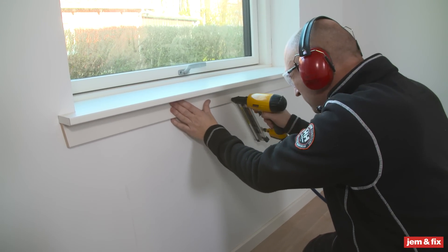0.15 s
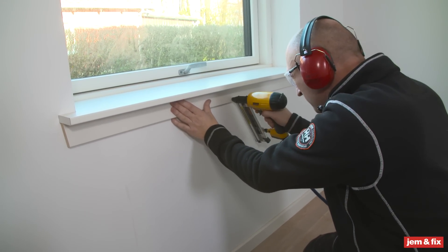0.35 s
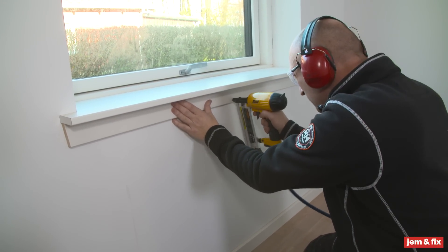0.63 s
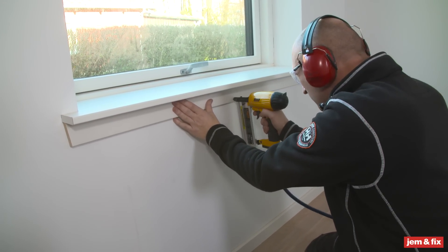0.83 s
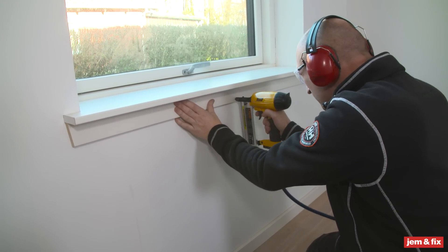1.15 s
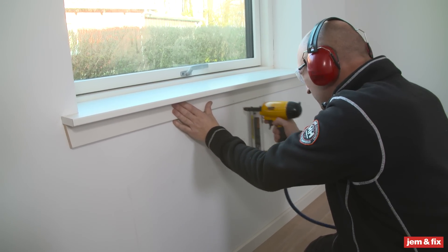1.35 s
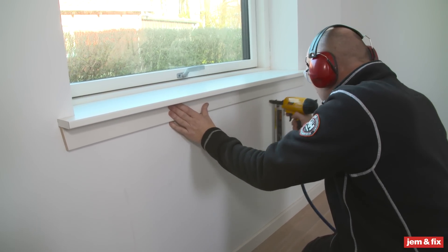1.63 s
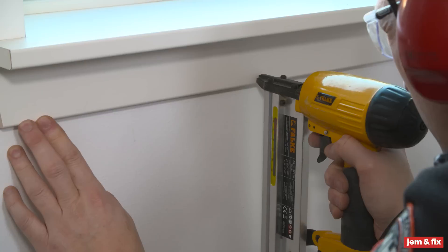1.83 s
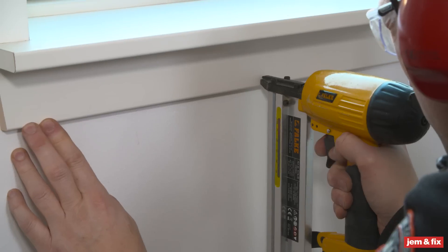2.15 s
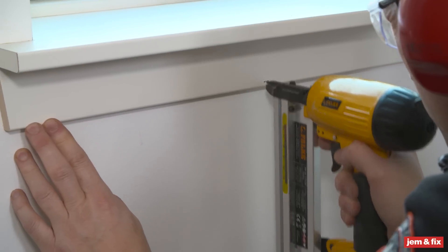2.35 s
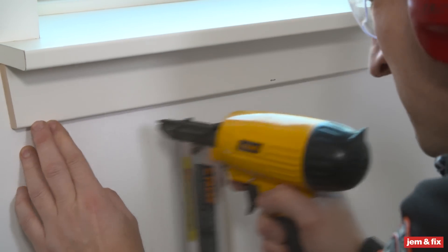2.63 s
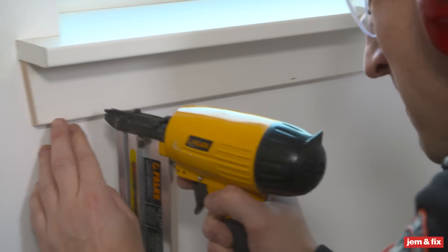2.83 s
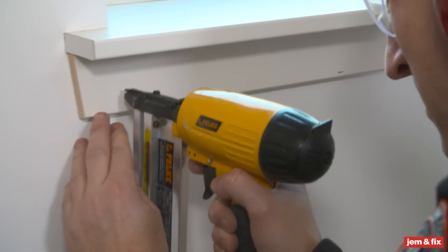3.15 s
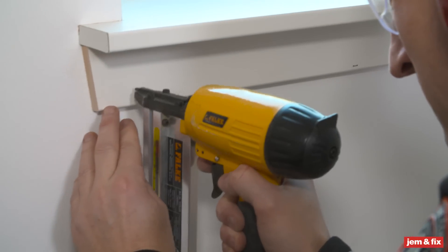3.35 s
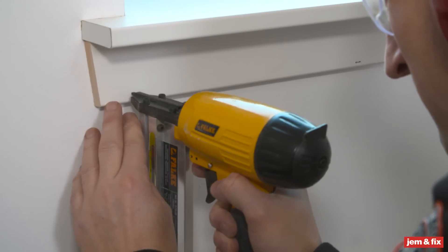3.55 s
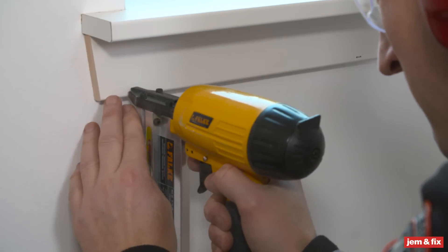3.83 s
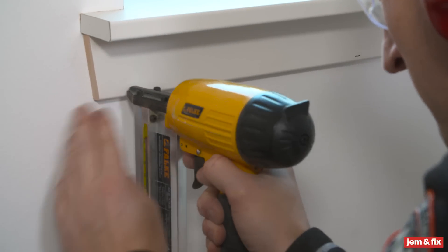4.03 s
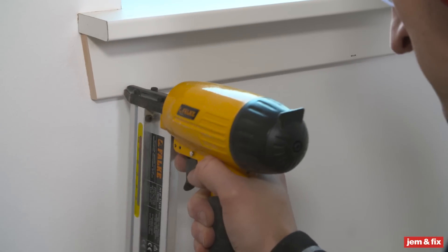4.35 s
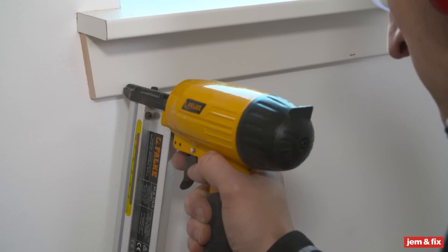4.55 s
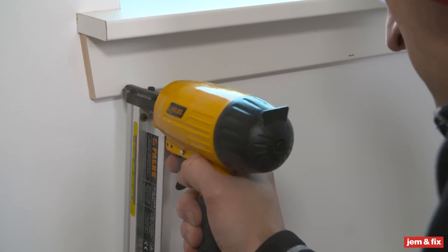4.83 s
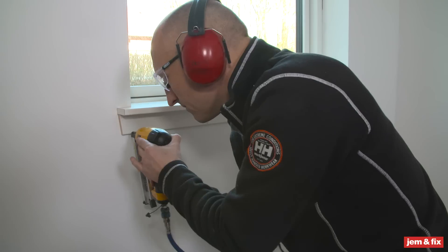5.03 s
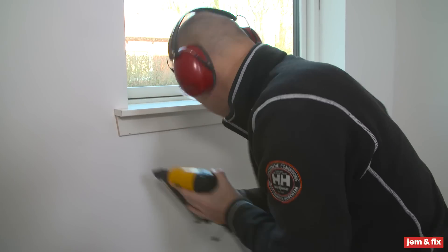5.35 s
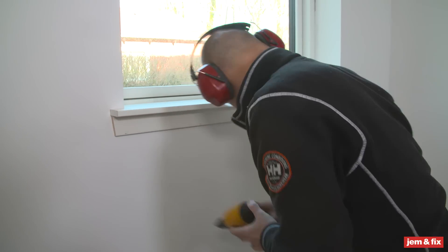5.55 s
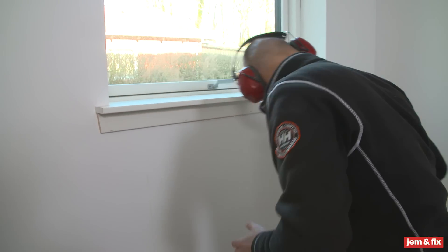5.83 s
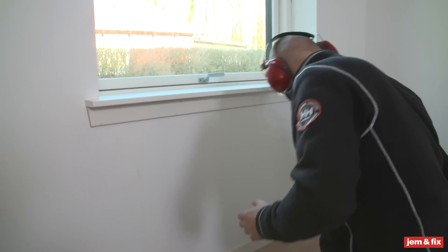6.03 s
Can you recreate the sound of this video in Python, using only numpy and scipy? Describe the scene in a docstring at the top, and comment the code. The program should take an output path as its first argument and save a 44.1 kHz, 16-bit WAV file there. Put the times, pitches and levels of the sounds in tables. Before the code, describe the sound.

A quiet, bare plaster room with faint low air noise, heard through one microphone. From 0 to 0.7 seconds a hand slides softly on wall and board; tiny low judders and clicks follow to 1.07. At 1.08 the air nailer spits, bangs into wood at 1.12, then blasts exhaust with a deep puff and piston knock around 1.25, hiss and hard room echo fading for about half a second. At 1.7 steel scrapes briefly on wood. The second shot comes at 2.18 to 2.4. From 2.7 sleeves and hands rub lightly; at 3.0 a small click, at 3.54 to 3.82 firmer wooden knocks and metallic ticks, then near quiet. A click at 4.98 leads straight into the third shot, banging at 5.02, exhausting near 5.17. At 5.58 a shoe lands and slides, a jacket swishes strongly around 5.8, and bright metal clicks sound at 6.03 and 6.11. Limiting flattens the shots and lifts their tails.

```python
"""A bare, echoing room: under a window sill a pneumatic nailer fixes a trim board with three shots.
Each is a spit of air at the valve, the driver's bang, the exhaust blast and the knock of the returning piston.
Coloured noise makes air and friction, dying noise bursts make blows, decaying sines make the ringing.
Between shots the gun touches the board, hands and sleeves rub; at the end the worker steps away.
One microphone hears it all over faint room air, and the recorder's limiter squashes the shots."""
import sys
import numpy as np
from scipy import signal
from scipy.fft import rfft, irfft
from scipy.io import wavfile
from scipy.ndimage import uniform_filter1d

SR = 44100
rng = np.random.default_rng(int(sys.argv[2]) if len(sys.argv) > 2 else 0)


def generate_wav(sig):
    """Save sig (samples, or channels by samples) to the path in sys.argv[1] as 16-bit PCM at SR."""
    pcm = np.round(np.clip(np.atleast_2d(sig).T, -1, 1) * 32767).astype(np.int16)
    wavfile.write(sys.argv[1], SR, pcm)


N = 273420
T = np.arange(N) / SR
AGE = T[:int(1.3 * SR)]   # time axis of one short sound


def from_db(db):
    """Amplitude ratio of a level in dB."""
    return 10 ** (np.asarray(db) / 20)


def rms_one(x):
    """Scales a signal to an RMS of 1."""
    return x / np.sqrt(np.mean(x ** 2) + 1e-20)


def at_hz(points, hz):
    """Reads a table on a log-frequency axis."""
    at, values = np.transpose(points)
    return np.interp(np.log(np.maximum(hz, 1)), np.log(at), values)


def through(x, response):
    """Convolves a sound with an impulse response, keeping its length."""
    return signal.oaconvolve(x, response)[:len(x)]


def place(sound, start):
    """Puts a short sound on the scene's time line."""
    return np.r_[np.zeros(int(start * SR)), sound, np.zeros(N)][:N]


def colour(x, spectrum, size=4096):
    """Causal (minimum-phase) filter that keeps the power of white noise."""
    spectrum_db = at_hz(spectrum, np.fft.rfftfreq(size, 1 / SR))
    cepstrum = irfft(np.log(from_db(spectrum_db)))
    # folding the cepstrum onto positive time makes the phase minimal
    cepstrum[1:size // 2] *= 2
    cepstrum[size // 2 + 1:] = 0
    response = irfft(np.exp(rfft(cepstrum)))
    return through(x, response / np.linalg.norm(response))


def resonate(x, hz, width_hz):
    """One resonance, gain 1 on top."""
    r = np.exp(-np.pi * width_hz / SR)
    feed = np.array([1, 0, -1]) * (1 - r * r) / 2
    feedback = [1, -2 * r * np.cos(2 * np.pi * hz / SR), r * r]
    return signal.lfilter(feed, feedback, x + 1e-18)


def ringing(modes):
    """One second of the decaying sines that a unit click leaves."""
    t = T[:SR]
    return sum(from_db(db - 60 * t / t60) * np.sin(2 * np.pi * hz * t) for hz, db, t60 in modes)


def jet(start, rise, hold, decay):
    """Turbulent air: opens, holds, then dies as the pressure falls."""
    age = np.maximum(AGE - start, 0)
    fade = np.exp(-np.clip((age - hold) / decay, 0, 50))
    return rng.standard_normal(len(age)) * np.minimum(age / rise, 1) * fade


def blow(start, decay):
    """A hard contact: a dying crunch of micro-impacts with an even spectrum."""
    t = T[:SR // 8]
    crunch = rng.standard_normal(len(t)) * np.exp(-t / decay)
    # keep only the phases, so that every frequency is equally strong
    even = irfft(np.exp(1j * np.angle(rfft(crunch))), len(t)) * np.exp(-t / (10 * decay))
    return place(even * np.sqrt(decay * SR / 2), start)[:len(AGE)]


def friction(rough_db, slip_hz):
    """Noise that catches and slips unevenly."""
    knots = rng.standard_normal(N // 8)
    grip_db = np.interp(T * slip_hz, np.arange(len(knots)), knots)
    return rms_one(rng.standard_normal(N) * from_db(rough_db * np.clip(grip_db, -2, 2)))


def stroke(start, rise, hold, db, sag_db_per_s, release_db_per_s):
    """Gain of one rubbing movement: it speeds up, sags while it lasts, then dies away."""
    age = np.maximum(T - start, 0)
    fade_db = sag_db_per_s * age + release_db_per_s * np.maximum(age - rise - hold, 0)
    return np.minimum(age / rise, 1) * from_db(db - fade_db)


def together(gains):
    """Overlapping movements add in power."""
    return np.sqrt(sum(gain ** 2 for gain in gains))


# spectrum of the quiet room: pitch_hz, relative level_db
QUIET_SPECTRUM = [(13, -32.5), (22, 9), (294, -1), (356, -10.5), (585, -8.5), (1970, -21.5), (6440, -21.5),
                  (14700, -25), (16000, -37.5)]


def room_air():
    """The room at rest: faint, steady noise, strongest in the bass."""
    return from_db(-65) * colour(rng.standard_normal(N), QUIET_SPECTRUM)


# standing waves in the room's air: pitch_hz, level_db, t60_s
STANDING_WAVES = [(55.2, -63.5, 0.45), (76, -62, 0.24), (90, -65, 0.38), (109.8, -58.5, 0.41),
                  (138.3, -67.5, 0.6), (156, -58.5, 0.55), (250, -66.5, 0.18), (291.5, -61.5, 0.63),
                  (1475, -63, .4)]


def standing_waves(x):
    """The air between the walls rings on at its own pitches."""
    return through(x, ringing(STANDING_WAVES))


# how long the echoes take to fall by 60 dB: pitch_hz, t60_s
ECHO_T60 = [(60, .42), (160, 0.48), (400, 0.44), (1000, 0.52), (3500, 0.52), (7000, 0.47), (11000, 0.4),
            (16000, 0.32)]


def room(x, first_echo=0.0036, build_up=0.0077):
    """Diffuse tail of bare plaster walls above the bass, dying band by band; drawn anew at each call."""
    t = T[:SR]
    white, hz = rfft(rng.standard_normal(SR)), np.fft.rfftfreq(SR, 1 / SR)
    edges = np.r_[np.geomspace(180, 4000, 7), np.linspace(5500, 15000, 7), SR / 2]
    tail = 0
    for lo, hi in zip(edges, edges[1:]):
        band = irfft(white * (hz >= lo) * (hz < hi))
        tail = tail + band * from_db(-60 * t / at_hz(ECHO_T60, (lo + hi) / 2))
    tail = tail * np.clip((t - first_echo) / build_up, 0, 1)
    return through(x, tail / np.linalg.norm(tail))


# swishes as an arm or the body moves: start_s, rise_s, hold_s, level_db
SWISHES = [(0.0, .01, 0.066, -70.5), (2.703, 0.074, 0.043, -53.5), (2.886, 0.057, 0.084, -59.5),
           (4.04, .03, .01, -62.5), (4.16, .06, 0.37, -72), (4.50, 0.15, 0.08, -61),
           (5.58, .03, 0.17, -40.5), (5.737, 0.089, 0.026, -25)]
# spectrum of rubbed cloth: pitch_hz, relative level_db
CLOTH_SPECTRUM = [(200, -5.5), (700, 8), (1500, 7), (3000, 4.5), (6300, 2.5), (8500, -4), (16000, -11)]


def jacket(brisk_db=-28):
    """Cloth on cloth; the stronger the sweep, the brighter it swishes."""
    sweep = together(stroke(s, rise, hold, db, sag_db_per_s=0, release_db_per_s=74)
                     for s, rise, hold, db in SWISHES)
    weave = sweep * friction(rough_db=2.5, slip_hz=940)
    brisk = np.minimum(sweep / from_db(brisk_db), 1)
    sheen = from_db(-20) * resonate(weave * brisk, hz=11900, width_hz=4000)
    return colour(weave, CLOTH_SPECTRUM) + sheen


# slides of a hand over wall and board: start_s, length_s, level_db (before a common trim)
HAND_SLIDES = [(0.0, .09, -54.5), (0.12, 0.23, -47.5), (0.406, 0.21, -60), (0.455, .03, -57),
               (2.75, 0.25, -50), (3.02, 0.13, -60.5), (3.237, .26, -58.5), (3.885, 0.085, -57),
               (4.039, .3, -62.5), (4.521, 0.29, -56), (5.419, .11, -45.5)]
# spectrum of sliding skin: pitch_hz, relative level_db
SKIN_SPECTRUM = [(71, -41), (120, -27), (167, -17), (248, -9.5), (307, -2.5), (386, -7), (720, -14.5),
                 (757, -15.5), (1200, -43.5), (2500, -55), (3250, -66), (5500, -120)]


def hands(rise_s=0.022):
    """Skin slides on plaster, catching and slipping."""
    slides = together(stroke(s, rise_s, length - rise_s, db, sag_db_per_s=12.5, release_db_per_s=258)
                      for s, length, db in HAND_SLIDES)
    return from_db(-4.0) * colour(slides * friction(rough_db=2.0, slip_hz=93.0), SKIN_SPECTRUM)


# finger judders on the wall, weight shifts on the tool: start_s, length_s, mean pitch_hz, level_db
JUDDERS = [(0.528, 0.045, 185, -52), (0.778, 0.025, 110, -55), (0.84, 0.047, 91, -47),
           (0.957, 0.063, 116, -43), (3.381, 0.037, 68.3, -53), (4.471, 0.023, 61, -60),
           (6.11, 0.018, 70, -44)]


def bumps(wander_hz=110, wander=0.18):
    """A few uneven low cycles of stick and slip, swelling and fading."""
    out = 0
    for s, length, hz, db in JUDDERS:
        slips = rng.standard_normal(size=400)
        pitch = hz * (1 + wander * np.interp(AGE * wander_hz, np.arange(len(slips)), slips))
        swell = np.sqrt(np.abs(np.sin(np.pi * np.minimum(AGE / length, 1))))
        cycles = np.sin(2 * np.pi * np.cumsum(pitch) / SR)
        out = out + place(from_db(db) * np.sqrt(2) * swell * cycles, s)
    return out


# spectrum of a sole on the floor: pitch_hz, relative level_db
SOLE_SPECTRUM = [(59, -46), (100, -22.5), (182, -15.5), (243, -12), (416, -1), (556, 0), (1080, -4),
                 (1170, -7.5), (2790, -23), (3430, -21.5), (8880, -39), (9450, -42), (14000, -44)]


def shoe(step_s=5.5755):
    """The sole lands hard, then slides on until it comes to rest."""
    landing = stroke(step_s, .003, hold=0.025, db=-18.5, sag_db_per_s=15, release_db_per_s=450)
    slide = stroke(step_s, 0.014, hold=.42, db=-27.5, sag_db_per_s=17, release_db_per_s=70)
    return colour(together([landing, slide]) * friction(rough_db=2.0, slip_hz=193.7), SOLE_SPECTRUM)


# spectrum of steel dragged on wood: pitch_hz, relative level_db
DRAG_SPECTRUM = [(100, -27), (200, -21.5), (330, -6), (480, 0.5), (750, -9.5), (1400, -14.5), (2000, -24.5),
                 (3200, -21.5), (5500, -30.5), (8000, -37), (14000, -36)]


def nose(start_s=1.699, length_s=0.15):
    """Steel dragged on wood: the board answers at once, a gritty hiss builds as the tip digs in."""
    drag = stroke(start_s, 0.0077, length_s, db=-36.5, sag_db_per_s=103.5, release_db_per_s=1500)
    dig = stroke(start_s, 0.043, length_s - .04, db=-43, sag_db_per_s=138.5, release_db_per_s=1500)
    grit = resonate(dig * friction(rough_db=4.0, slip_hz=400), hz=5000, width_hz=3400)
    return colour(drag * friction(rough_db=1.0, slip_hz=156), DRAG_SPECTRUM) + grit


def rubbing():
    """Skin on plaster, steel on wood, sole on floor, cloth on cloth."""
    return hands() + nose() + shoe() + jacket()


# the gun touches the board; its safety tip, trigger and hose coupling click:
# start_s, wood level_db, metal level_db (before a common trim), metal pitch_hz, decay_s
TOUCHES = [(0.83, -61, -53.5, 4000, 0.0091), (1.006, -54.5, -52, 2780, 0.012),
           (1.062, -68, -39, 6770, 0.0027), (1.073, -54, -45, 4750, .015), (1.952, -65, -58, 5000, 0.0035),
           (2.153, -59, -53.5, 4200, 0.015), (2.995, -66, -34.5, 4000, 0.005),
           (3.382, -67, -54, 3600, 0.01), (3.541, -28.5, -48, 3960, 0.0051),
           (3.546, -23, -33.5, 7500, 0.006), (3.6435, -36, -25, 7400, 0.007),
           (3.699, -46, -51, 4000, 0.013), (3.763, -44, -56, 3960, 0.012),
           (3.824, -37.5, -60, 5050, 0.0073), (4.052, -54.5, -49.5, 5500, 0.0055),
           (4.480, -59, -44.5, 4500, 0.0053), (4.643, -52, -60, 2000, 0.017),
           (4.957, -55, -65, 2490, 0.026), (4.980, -38, -33.5, 4440, 0.029),
           (5.5755, -20, -29, 3000, 0.0031), (5.633, -26.5, -30, 8500, 0.006),
           (6.026, -36.5, -26, 5800, 0.01), (6.11, -33.5, -19, 6400, 0.011),
           (6.120, -25.5, -13, 7300, 0.0028)]
# spectrum of a wooden knock: pitch_hz, relative level_db
KNOCK_SPECTRUM = [(40, -21.5), (110, -19), (160, -5.5), (210, -10.5), (330, 4.5), (700, -3), (1150, -4),
                  (1700, -7.5), (2100, -17), (6000, -26.5), (16000, -39.5)]
# what rings in the trim board: pitch_hz, level_db, t60_s
BOARD_RING = [(342, -48.5, .09), (730, -45.5, 0.05), (1020, -44, .09), (1185, -37.5, 0.07),
              (1320, -45, 0.051), (1510, -45, 0.08)]
# what rings in the gun's steel: pitch_hz, level_db, t60_s
GUN_RING = [(3400, -39, 0.09), (4380, -37, .04), (4580, -35, .04), (4900, -36, .035), (5840, -34, 0.0075),
            (7100, -39, 0.044), (9300, -43, 0.036)]


def taps():
    """Each touch is part wooden knock, part metal click; board and gun ring on briefly."""
    wood = metal = 0
    for s, wood_db, metal_db, metal_hz, decay in TOUCHES:
        wood = wood + place(from_db(wood_db) * blow(0, decay), s)
        # smaller parts click higher
        click = resonate(resonate(blow(0, decay), metal_hz, metal_hz), metal_hz, metal_hz)
        metal = metal + place(from_db(metal_db) * click, s)
    wood = colour(wood, KNOCK_SPECTRUM)
    wood_ringing = wood + through(wood, ringing(BOARD_RING))
    metal_ringing = metal + through(metal, ringing(GUN_RING))
    return wood_ringing + from_db(-1.5) * metal_ringing


# spectra of the parts of a shot: pitch_hz, relative level_db
VALVE_SPECTRUM = [(40, 6), (200, 10), (900, 4.5), (1700, -1), (2300, -0.5), (3100, 8.5), (4500, 3),
                  (5700, 0), (7000, 4), (10000, -1), (14000, 4), (16000, -5)]
BOARD_SPECTRUM = [(40, -10), (100, 0), (280, -2), (550, -4.5), (800, -2), (1100, -6.5), (1500, -5.5),
                  (1900, -12), (4000, -22), (16000, -41)]
STEEL_SPECTRUM = [(100, -13.5), (1000, -20.5), (2000, -4), (2750, 1.5), (3300, -1), (4600, 2), (6500, -2.5),
                  (9000, -6.5), (14500, -11), (16000, -13)]
EXHAUST_SPECTRUM = [(30, 3.5), (80, 4), (250, 2), (900, 0), (1600, -6), (2200, -1), (3600, 4), (5600, 2.5),
                    (7500, 4.5), (10000, 3), (14500, 2.5), (16000, -8)]
PISTON_SPECTRUM = [(40, -2.5), (250, -0.5), (800, 3), (1300, 2.5), (1600, -13.5), (4000, -17.5),
                   (16000, -40.5)]
# the three shots: valve start_s, bang start_s, piston return start_s, valve level_db, board level_db,
# board pitch_hz, return level_db, standing-wave level_db (levels before the mix of direct sound and room)
NAIL_SHOTS = [(1.0847, 1.118, 1.2735, -10, 12.5, 310, 4.5, -2),
              (2.177, 2.207, 2.372, -12.5, 10.5, 476.5, 7, -5.5),
              (4.9919, 5.02, 5.190, -10.5, 15, 870, 7, -5)]


def shot(valve_s, bang_s, return_s, valve_db, board_db, board_hz, return_db, standing_db):
    """Valve spit, driver blow into board and steel, exhaust blast, piston back on its stop, last air venting."""
    bang_at, return_at = bang_s - valve_s, return_s - valve_s
    exhaust_at = return_at - .037   # the exhaust opens before the piston is back on its stop
    valve = from_db(valve_db) * colour(jet(0, rise=0.0077, hold=0.048, decay=0.0078), VALVE_SPECTRUM)
    drive = from_db(board_db) * blow(bang_at, decay=0.009)
    # the board's main resonance depends on where it is nailed
    board = colour(drive + from_db(-3.0) * resonate(drive, board_hz, width_hz=220), BOARD_SPECTRUM)
    steel = from_db(3.5) * colour(jet(bang_at, rise=0.015, hold=0.01, decay=.02), STEEL_SPECTRUM)
    # hold times of blast and vent count from their own start
    blast = jet(exhaust_at, rise=0.0096, hold=0.023, decay=0.011)
    vent = from_db(-9.5) * jet(return_at, rise=0.055, hold=0.062, decay=0.04)
    exhaust = from_db(-7) * colour(blast + vent, EXHAUST_SPECTRUM)
    # the first slug of spent air leaves the cap as a deep puff
    puff = from_db(15) * resonate(blow(exhaust_at, decay=0.021), hz=97, width_hz=110)
    piston = from_db(return_db) * colour(blow(return_at, decay=0.0013), PISTON_SPECTRUM)
    # the nose is buried in the board, so the blow arrives mostly by way of the walls
    direct = from_db(-3) * (valve + exhaust + puff + piston) + from_db(-7.5) * (board + steel)
    gun = valve + board + steel + exhaust + puff + piston
    reflected = from_db(-4.0) * room(gun) + from_db(standing_db) * standing_waves(gun)
    return place(direct + reflected, valve_s)


def scene():
    """One microphone hears the shots, the handling and the quiet room, equal on both channels."""
    shots = sum(shot(*row) for row in NAIL_SHOTS)
    touches, rubs = taps(), rubbing()
    touch_echoes = from_db(-8) * room(touches) + from_db(0.5) * standing_waves(touches)
    rub_echoes = from_db(-22.5) * room(rubs)
    mono = shots + touches + rubs + bumps() + touch_echoes + rub_echoes + room_air()
    return np.array([mono, mono])


def limiter(x, threshold_db=-19, knee_db=8.0, squash=0.85, release_db_per_s=220, attack=0.00054, window=0.0041):
    """Fast soft-knee gain control: it flattens each shot into a plateau and lifts the room's tail."""
    power = uniform_filter1d(x[0] ** 2, max(int(window * SR), 1))
    # the held level jumps up with the sound and falls at the release rate
    fall = release_db_per_s * T
    held_db = np.maximum.accumulate(10 * np.log10(np.abs(power) + 1e-12) + fall) - fall
    cut_db = squash * knee_db * np.logaddexp(0, (held_db - threshold_db) / knee_db)
    r = np.exp(-1 / (attack * SR))
    smooth_cut_db = signal.lfilter([1 - r], [1, -r], cut_db)
    return x * from_db(-smooth_cut_db)


def record(dry):
    """Limiter, rounded peaks, and the top cut off."""
    ceiling, cutoff_hz = .45, 15900
    rounded = ceiling * np.tanh(from_db(1.27) * limiter(dry) / ceiling)
    lowpass = signal.ellip(12, .1, 80, cutoff_hz, fs=SR, output="sos")
    return signal.sosfilt(lowpass, rounded)


dry = scene()
out = record(dry)
generate_wav(out)
```